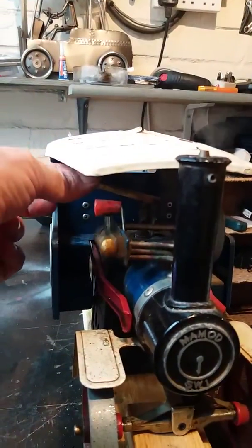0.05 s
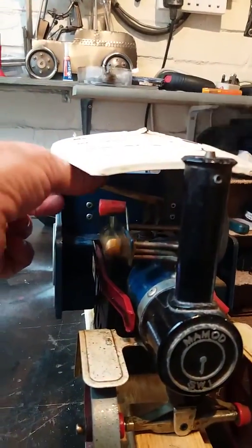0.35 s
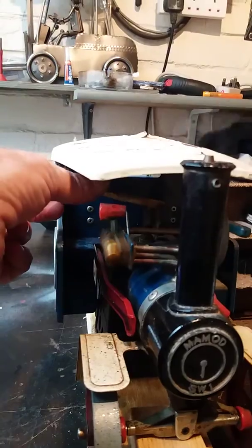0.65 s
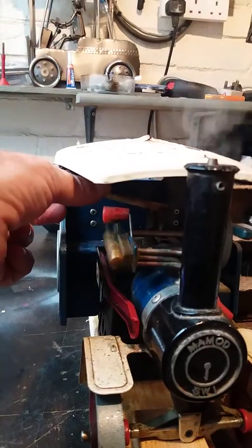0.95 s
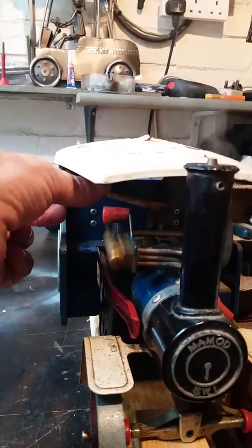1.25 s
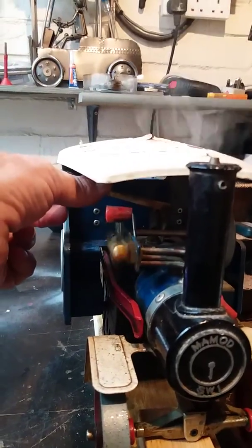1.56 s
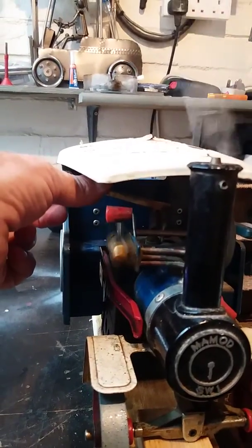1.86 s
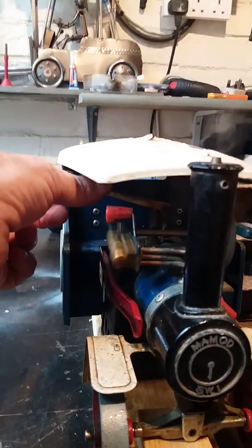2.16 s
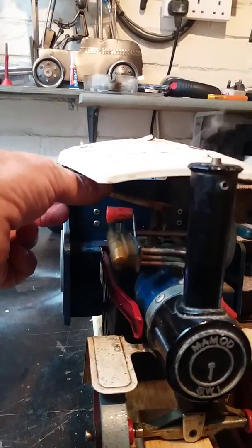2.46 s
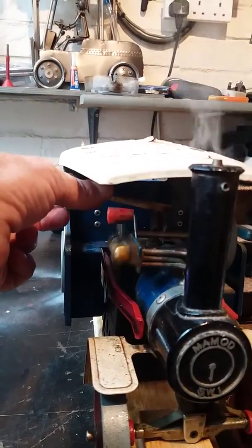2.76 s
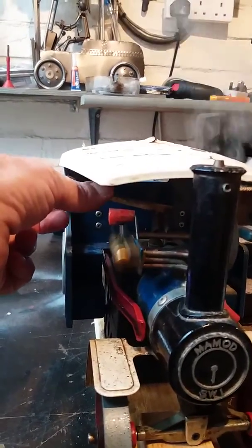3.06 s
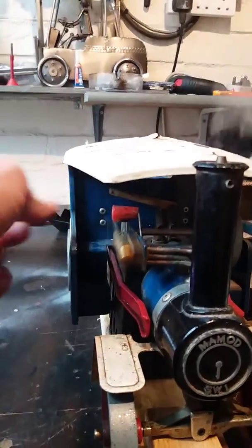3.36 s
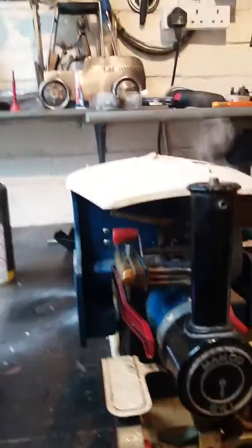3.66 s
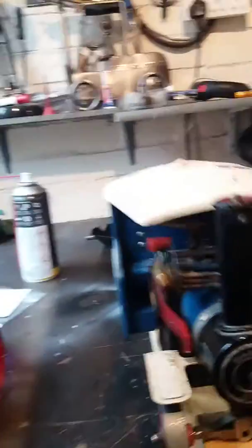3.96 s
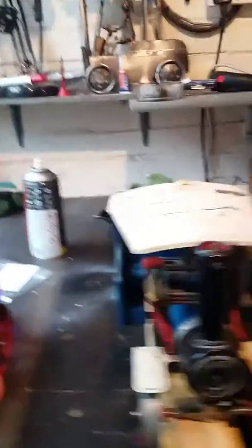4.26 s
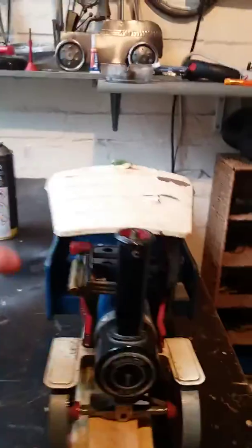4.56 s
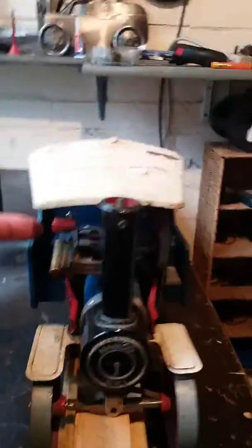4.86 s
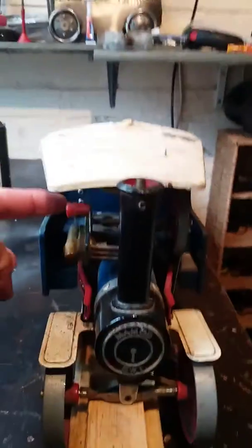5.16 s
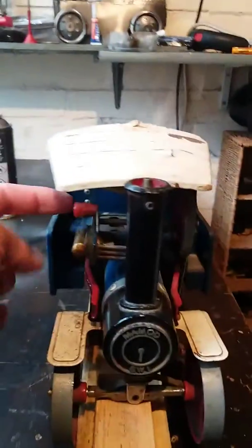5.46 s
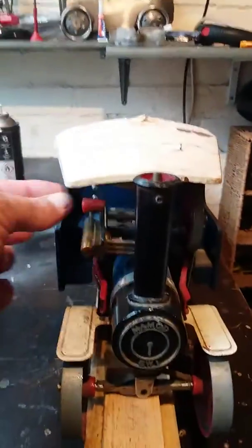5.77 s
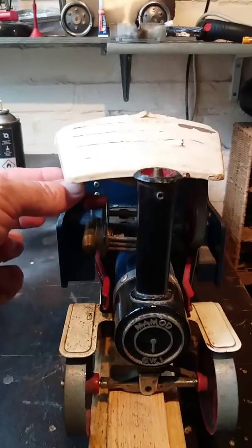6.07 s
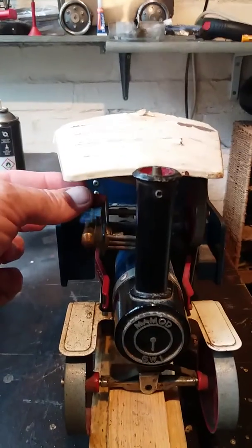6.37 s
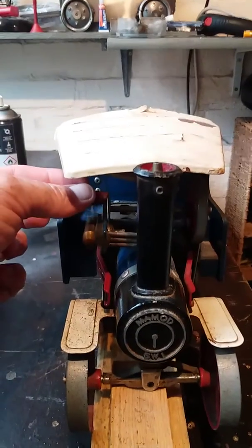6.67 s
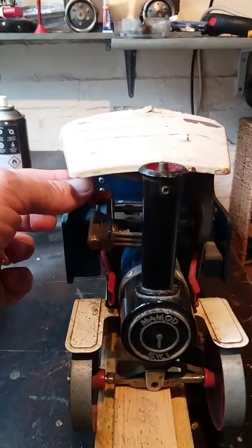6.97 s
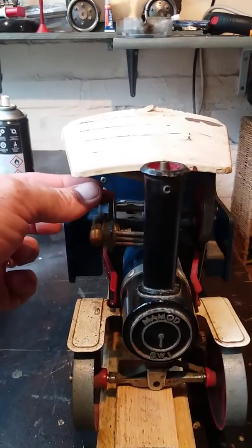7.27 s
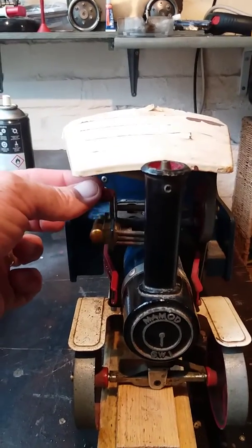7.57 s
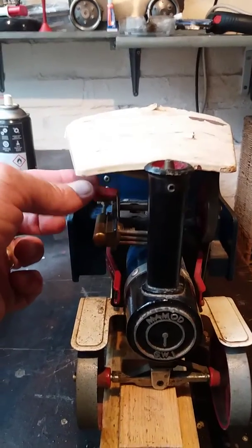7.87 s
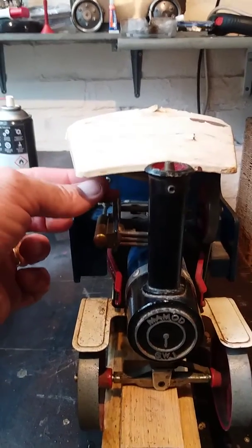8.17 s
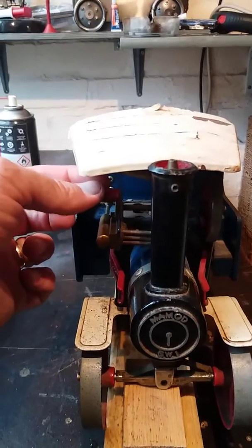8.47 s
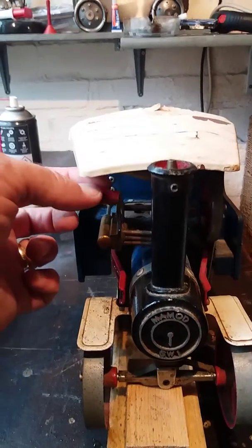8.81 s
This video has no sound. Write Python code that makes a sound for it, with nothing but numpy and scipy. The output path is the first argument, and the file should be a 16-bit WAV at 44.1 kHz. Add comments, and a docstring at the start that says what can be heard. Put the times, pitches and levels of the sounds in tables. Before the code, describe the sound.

Close up in a small workshop, a little steam engine chuffs quickly, its metal parts rattling and squeaking. Three brief, piercing whistle toots sound over it, then three more, each with wet hiss and gusts buffeting the microphone. The engine knocks harder for a while, labours and stalls. Steam keeps leaking quietly as a hand lightly rubs and taps the tin.

```python
"""A workshop bench, the microphone close to a running toy steam engine.
Each turn of the crank gives a knock in the tin body, a chuff up the chimney and a puff of hiss; late on
it labours, slows and stops, and a hand settles on the tin. Early on its tiny whistle is blown six times:
shrill, hissing and spitting, with gusts of wet steam striking the microphone.
The recorder's limiter holds the blasts down."""
import sys
import numpy as np
from scipy import signal
from scipy.fft import irfft, next_fast_len
from scipy.io import wavfile
from scipy.ndimage import uniform_filter1d

SR = 44100
rng = np.random.default_rng(int(sys.argv[2]) if len(sys.argv) > 2 else 0)


def int16_out(signal):
    """Quantize to a 16-bit WAV file."""
    q = np.round(np.clip(np.atleast_2d(signal).T, -1, 1) * 32767)
    wavfile.write(sys.argv[1], SR, q.astype(np.int16))


N = 389844
TIME = np.arange(N) / SR

# speed of the crank, which sags under load and stalls: t/s, speed/(turns per s)
CRANK_SPEED = [(0, 16.097), (.6, 16.245), (1.4, 15.765), (2.5, 15.921), (3.4, 15.04), (4.1, 15.036),
               (5, 15.54), (6.1, 15.671), (6.6, 14.808), (6.9, 10.388), (7.4, 11.392), (7.8, 8.492),
               (7.86, 0)]
def crank(start_turn):
    """Position of the crank in turns; it times every stroke of the engine."""
    return start_turn + np.cumsum(in_time(CRANK_SPEED)[0]) / SR


# force of the knock: t/s, level/dB
KNOCK_FORCE = [(0, -37.5), (.4, -34.5), (.55, -27.5), (1.3, -32), (2.3, -29), (3.3, -35), (4.2, -38),
               (4.65, -23.5), (5.1, -23), (6.42, -22.5), (6.62, -38.5), (7.6, -43.5)]
# strokes that catch hard or nearly miss: t/s, level/dB against the usual force
ODD_STROKES = [(0.678, -22), (3.469, 3), (6.008, -9), (6.072, -6.5), (6.136, 1), (6.2, -33), (6.265, 1.5),
               (6.823, -21), (6.916, 15), (7.196, 6), (7.66, -22)]
# how bright the knocks sound at the microphone, shifting through the scene: t/s, relative level/dB
BRIGHTNESS = [(0, -11.5), (.5, -8.5), (1.4, -0.5), (2.5, -7.5), (3.3, 3), (4.2, 5), (4.7, -7.5), (6.4, -7.5),
              (6.8, -9), (7.7, -1)]
# modes of the tin body and bench: f/Hz, level/dB, t60/s
BODY_MODES = [(221.4, -14.5, 0.064), (329, -6.5, 0.13), (411, -18, 0.14), (509, -4, 0.035),
              (566.7, 8.5, 0.035), (637.5, -1, 0.055), (882, -4.5, 0.048), (948, -7.5, 0.098),
              (1175, 7.5, 0.028), (1326, -13, 0.062), (690, -12.5, 0.11)]
# modes of the crank and cylinder: f/Hz, level/dB, t60/s
CLANK_MODES = [(1530, -8, 0.15), (1709, -0.5, 0.073), (2044, 8, 0.061), (2161, 7, 0.038),
               (2303, 4.5, 0.068), (3034, -4, 0.072)]
def knocks(turns, body_db, crack_db):
    """Close up, play in the crank closes once a turn; the same parts ring, brighter on harder knocks."""
    at = once_a_turn(turns, 0)
    times, force, brightness = TIME[at], in_time(KNOCK_FORCE)[0][at], in_time(BRIGHTNESS)[0][at]
    for s, db in ODD_STROKES:
        force[np.argmin(abs(times - s))] += db
    # the clank grows with the brightness, and faster than the knock with force
    clank_db = force - 0.5 + 1.67 * brightness + 1.44 * (force + 25.5)
    body = convolve(blows(times, force + body_db), ringing(BODY_MODES, attack=0.0093))
    clank = convolve(blows(times, clank_db), ringing(CLANK_MODES, attack=0.0047))
    contacts = blows(times, force + brightness + crack_db, spread_db=2.5)
    cracks = convolve(contacts, crack(t60=0.033, tail_db=-12, tail_t60=0.11, attack=0.0018))
    return body + clank + cracks + chatter(times, force + brightness)


# spectrum of metal striking metal: f/Hz, level/dB
CRACK_SPECTRUM = [(700, 3), (1500, 1.5), (3000, 3), (3900, -1.5), (5000, -0.5), (6600, -7), (8200, 3.5),
                  (11000, -4), (15500, -14)]
def crack(t60, tail_db, tail_t60, attack):
    """A metal contact with the scatter of nearby things behind it."""
    t = TIME[:SR // 4]
    decay = from_db(-60 * t / t60) + from_db(tail_db - 60 * t / tail_t60)
    return noise(CRACK_SPECTRUM, size=len(t)) * np.minimum(t / attack, 1) * decay


def chatter(times, level_db, gap_s=0.0049, loss_db=3):
    """The loose crank pin makes four uneven, fading bounces after each knock, duller than the first hit."""
    bounces = times[:, None] + np.cumsum(gap_s * rng.uniform(.5, 1.5, (len(times), 4)), axis=1)
    clicks = sum(blows(s, level_db - 1 - k * loss_db, spread_db=6) for k, s in enumerate(bounces.T))
    spectrum = [(900, 3), (2200, 0), (3200, -3), (5200, -2), (7000, -8), (15000, -18.5)]
    return convolve(clicks, burst(spectrum, t60=0.01))


# steam let out at each turn: t/s, relative level/dB at the cylinder, the same in the chimney
STEAM_FLOW = [(0, -38, -37), (.6, -36.5, -36), (1.5, -38.5, -38.5), (4.1, -39, -40), (4.6, -38, -34.5),
              (6.2, -32, -34), (7.55, -33.5, -33.5), (7.67, -31.5, -44.5), (7.8, -66, -37.5)]
# steady leak of steam: t/s, level/dB
LEAK = [(0, -81), (7.65, -51.5), (8, -56.5), (8.6, -56)]
# spectra of the cylinder's puff, the spat water and the chimney's chuff: f/Hz, level/dB
PUFF_SPECTRUM = [(900, -15.5), (1900, 4), (2750, 2), (3500, -8.5), (5200, 4), (6700, -8), (7900, 2),
                 (11000, 3), (13500, 3), (15200, 4), (16500, 2.5)]
SPIT_SPECTRUM = [(3000, -12.5), (7000, -9), (8300, 1), (10000, -1.5), (16000, -1)]
CHUFF_SPECTRUM = [(60, -34), (145, 0.5), (185, -11), (218, -1.5), (262, -7), (330, 4.5), (400, 6),
                  (460, -0.5), (660, -2), (790, -13.5), (930, -4), (1200, -4.5), (1550, -23), (2300, -12),
                  (4000, -33)]
def steam(turns, puff_db, spit_db, chuff_db):
    """Steam escapes at the cylinder face, spits a little water on the return and chuffs up the chimney."""
    cylinder_db, chimney_db = in_time(STEAM_FLOW)
    puff = port(turns, opens=0.662, rise=0.12, fall=0.22) * from_db(cylinder_db + puff_db + 2 * drift(56))
    splutter_db = 6.9 * drift(330) + 2.2 * drift(10)
    spit = port(turns, opens=0.25, rise=0.05, fall=0.11) * from_db(cylinder_db + spit_db + splutter_db)
    chuff = port(turns, opens=0.918, rise=0.055, fall=0.92) * from_db(chimney_db + chuff_db)
    leak = from_db(in_time(LEAK)[0] + 2 * drift(380))
    hiss = (puff + leak) * noise(PUFF_SPECTRUM)
    return hiss + spit * noise(SPIT_SPECTRUM) + chuff * noise(CHUFF_SPECTRUM)


FULL_SPEED, SLOW_SPEED = 15.5, 10   # turns per s, running free and labouring
STOP_S, RELEASE_S = 7.86, 0.08
def port(turns, opens, rise, fall):
    """Flow through a port, timed in full-speed turns; a puff keeps its length down to SLOW_SPEED."""
    since = (turns - opens) % 1 * FULL_SPEED / np.maximum(in_time(CRANK_SPEED)[0], SLOW_SPEED)
    running = np.clip((STOP_S - TIME) / RELEASE_S, 0, 1)
    return np.minimum(since / rise, 1) * np.exp(-np.maximum(since - rise, 0) / fall) * running


# pressure pulse of the exhaust: t/s, level/dB
EXHAUST_PULSE = [(0, -34), (.55, -27.5), (1.7, -36), (2.3, -32), (3.3, -38.5), (4.2, -43.5), (5, -30.5),
                 (6.1, -32.5), (6.7, -36.5), (7.5, -33.5), (7.7, -44)]
# modes of the hollow chimney and boiler: f/Hz, level/dB, t60/s
CHIMNEY_MODES = [(130.8, -15.5, 0.39), (319.7, -4, 0.16), (383, -3, 0.058), (466, 0.5, 0.047),
                 (549, -0.5, 0.045), (672.4, -3.5, .07), (1120, -7, 0.034), (1340, -10, .035)]
def exhaust(turns, opens, shuts, shut_db):
    """The exhaust port thumps the chimney as it opens, and again as it shuts."""
    level_db, = in_time(EXHAUST_PULSE)
    first, second = once_a_turn(turns, opens), once_a_turn(turns, shuts)
    pulses = blows(TIME[first], level_db[first]) + blows(TIME[second], level_db[second] + shut_db)
    return convolve(pulses, ringing(CHIMNEY_MODES, attack=0.0015))


# piston squeaks: t/s, level/dB of the low squeak, level/dB of the high one
SQUEAKS = [(0, -37, -49), (3.6, -41.5, -64), (4.6, -37, -33.5), (6.4, -37, -42), (7.6, -35, -42)]
# squeaks that stand out: t/s, level/dB above the usual
ODD_SQUEAKS = [(.168, 4), (2.043, 5), (3.587, 10), (3.655, 7), (4.052, 6), (7.172, 3.5)]
def squeak(turns, voice, hz, width_hz, scatter_hz, spread_db=3):
    """The piston rubs with a short, scratchy squeak (voice 0 low, 1 high), different on each turn."""
    turn = turns.astype(int)
    pitch, strength = rng.standard_normal((turn.max() + 1, 2)).T
    stroke_db = spread_db * strength
    for s, db in ODD_SQUEAKS:
        stroke_db[turn[int(s * SR)]] = db
    phase = phase_of(hz + scatter_hz * pitch[turn] + width_hz * drift(1500))
    scratch = from_db(in_time(SQUEAKS)[voice] + stroke_db[turn] + 4.8 * drift(600))
    return port(turns, opens=0.606, rise=0.22, fall=0.07) * scratch * np.sin(phase) * (TIME < 7.6)


# wet chirps on the return stroke: t/s, level/dB
CHIRPS = [(0, -42), (.6, -35.5), (1.8, -46), (4.2, -42), (6.3, -63), (6.9, -42.5)]
def chirps(turns, hz_per_speed, climb_hz_per_turn, scatter_hz, opens):
    """Water squeezed out at the cylinder face chirps upwards, lower as the crank slows."""
    turn = np.floor(turns - opens).astype(int) + 1
    pitch, strength = rng.standard_normal((turn.max() + 1, 2))[turn].T
    start_hz = hz_per_speed * in_time(CRANK_SPEED)[0] + scatter_hz * pitch
    climb_hz = climb_hz_per_turn * np.minimum((turns - opens) % 1, .4)
    phase = phase_of(start_hz + climb_hz + 900 * drift(2300))
    level = from_db(in_time(CHIRPS)[0] + 4.1 * strength + 5.9 * drift(450))
    return port(turns, opens, rise=0.044, fall=.07) * level * np.sin(phase) * (TIME < 7.6)


# the shaken bench: t/s, level/dB at 9 times the crank rate, level/dB at 14 times
BENCH_HUM = [(0, -55, -55), (1.8, -59, -49.5), (3.4, -52, -61), (4.2, -54.5, -57), (5, -56.5, -44.5),
             (6.15, -58, -43.5), (6.25, -62, -54)]
def bench_hum(turns):
    """The bench under the engine takes up two overtones of the crank rate."""
    low_db, high_db = in_time(BENCH_HUM)
    low = from_db(low_db + 2 * drift(20)) * np.sin(2 * np.pi * 9 * turns)
    high = from_db(high_db) * np.sin(2 * np.pi * 14 * turns)
    return np.sqrt(2) * (low + high)


# spectra of the whistle's steam jet and of the hiss at its valve: f/Hz, level/dB
JET_SPECTRUM = [(40, -31), (90, -0.5), (250, -7.5), (600, -13.5), (1200, -14), (2500, -15.5), (5000, -22.5),
                (7500, -18.5), (10000, -21.5), (13000, -21.5), (15500, -14.5)]
VALVE_SPECTRUM = [(1000, 0), (4000, -12.5), (6200, 5), (9000, 1.5), (15500, -26)]
def whistle(jitter, waver, break_up, jet_db, low_tone_hz, room_db):
    """Steam sounds a short pipe; as the valve shuts it spits and breaks up, and the workshop rings on."""
    pitch, drive, rush, overtone, low_level, closing, ring, spit = blast_controls()
    unsteady = waver * drift(45) + (jitter + break_up * closing) * (drift(150) + drift(1500))
    phase = phase_of(pitch * (1 + unsteady))
    # droplets in the pipe make the tone flutter
    drive = drive * from_db(1.37 * drift(200))
    octave = overtone * from_db(5 * drift(250)) * np.sin(2 * phase)
    # a weak flow only hisses: the pipe needs some pressure to speak
    tone = drive * np.minimum(drive / 0.12, 1) * np.sin(phase)
    # a faint low tone from the recorder during loud blasts
    low_phase = phase_of(low_tone_hz + 96 * drift(400))
    low_tone = low_level * (np.sin(low_phase) + 0.39 * np.sin(2 * low_phase))
    jet = rush * from_db(jet_db + 4.2 * drift(160)) * noise(JET_SPECTRUM)   # the wet jet splutters
    hiss = spit * noise(VALVE_SPECTRUM)
    high_ring = ring * noise([(12500, -35), (14500, 4), (15800, -3.5), (17000, -34)])
    room = from_db(room_db) * workshop(tone + 0.25 * jet, t60=0.19)
    return tone + octave + low_tone + jet + hiss + high_ring + room


WEAK_HZ, THIN_DB = 6727, -14   # pitch of the barely filled pipe; the rush while the valve hesitates
SEEP_S, SEEP_DB, SEEP_HISS_DB, SEEP_HZ_PER_S = 0.033, -32.5, -34.5, 79000
SAG_S, SPIT_S, RING_T60_S = 0.02, 0.009, 0.09   # as the valve shuts
# whistle blasts: opening t/s, shutting t/s, full pitch f/Hz, drive level/dB, hesitation t/s, then relative
# level/dB of the octave, the recorder's low tone, the overtone's ring, rush of steam and shut-off spit
BLASTS = [(0.684, 0.793, 7807, 5, 0.0023, 6.5, -11, -23.5, 0.5, -10.5),
          (0.996, 1.155, 7690, 3.5, 0.0033, -7.5, -23.5, -22.5, 0.5, -22),
          (1.345, 1.526, 7646, 5, 0, -9.5, -40, -20, 0.5, -15),
          (2.331, 2.479, 7526, 1, 0.037, -8, -38, -21, 0.5, -17),
          (2.668, 2.853, 8140, 1.5, 0, -3, -21, -17.5, -2.5, -15.5),
          (2.964, 3.142, 7947, 0, 0.0011, -9.5, -20.5, -16.5, -1, -9)]
def blast_controls():
    """Pitch and strengths of the whistle: steam seeps past the valve, fills the pipe and is shut off."""
    controls = np.zeros((8, N))
    for opens, shuts, top_hz, level_db, hesitation, *parts_db in BLASTS:
        octave, low_tone, ring, rush, spit = from_db(parts_db)
        near = slice(int((opens - SEEP_S) * SR), int((shuts + .5) * SR))
        t = TIME[near]
        opening, fill = valve(t, opens, shuts, hesitation)
        seep_hz = SEEP_HZ_PER_S * np.maximum(opens - t, 0)
        pitch = (t < shuts) * (WEAK_HZ + (top_hz - WEAK_HZ) * fill - seep_hz)
        drive = (t < shuts) * (opening + from_db(SEEP_DB)) * from_db(level_db - 9 * (1.5 - fill))
        # a hesitant valve gives a thin tone before the steam rushes out
        jet = drive * rush * np.where(t < opens + hesitation, from_db(THIN_DB * opening), 1)
        # the octave and the low tone come up only near full pressure
        full = drive * opening * (.12 + 0.65 * fill ** 5)
        # the whistle's high overtone rings briefly in the room as the valve shuts
        dying = ramp_to(t, shuts, SAG_S) * from_db(-60 * np.maximum(t - shuts, 0) / RING_T60_S)
        closing = np.exp(-np.minimum(((t - shuts + SPIT_S) / SPIT_S) ** 2, 20))
        hiss = closing * spit + (t < opens) * from_db(SEEP_HISS_DB) * ramp_to(t, opens, SEEP_S)
        controls[:, near] += [pitch, drive, jet, full * octave, full * low_tone,
                              closing, dying * ring, hiss]
    return controls


def valve(t, opens, shuts, hesitation, attack_s=0.0075, fill_s=0.013, sag_share=0.65):
    """How far the valve is open and how full the pipe is, both 0-1: it fills fast and sags at the end."""
    opening = np.clip((t - opens) / (attack_s + .5 * hesitation) + 0.71, 0, 1) ** 2
    fill = 1 - np.exp(-np.maximum(t - opens - hesitation, 0) / fill_s)
    return opening, fill * (1 - sag_share * ramp_to(t, shuts, SAG_S) ** 2)


# the heaviest gusts of wet steam on the microphone: t/s, relative level/dB
GUSTS = [(0.687, -15.5), (0.701, -4.5), (.778, 0), (1.096, -6), (1.119, -7), (1.514, -9.5), (2.461, -9.5),
         (2.702, -4.5), (2.763, -7), (2.832, -4.5), (3.02, -5), (3.06, -13.5), (3.11, -7.5), (3.129, -7)]
def gusts(heavy_db, light_db, light_per_s, travel_s=0.025):
    """The whistle's steam strikes the microphone in damped thumps; the light ones merge into a rumble."""
    blowing = sum((TIME > opens + hesitation + travel_s) & (TIME < shuts)
                  for opens, shuts, _, _, hesitation, *_ in BLASTS)
    clicks = (rng.random(N) < blowing * light_per_s / SR) * from_db(light_db + 2 * rng.standard_normal(N))
    for s, db in GUSTS:
        clicks[int(s * SR)] = from_db(db + heavy_db)
    modes = [(99, 0, 0.031), (187, 9.5, 0.011), (533, 2.5, 0.0053), (1300, -2, 0.006)]
    return convolve(clicks * rng.choice([-1, 1], N), ringing(modes, attack=0.0005))


# small knocks as the hand settles: t/s, relative level/dB
TAPS = [(8.34, -50), (8.64, -55)]
# the hand rubbing on the canopy: t/s, level/dB
RUBBING = [(8.25, -62), (8.37, -55), (8.7, -52), (8.84, -57)]
def hand(tap_db):
    """Fingers rub and tap the tin of the stopped engine."""
    clicks = np.zeros(N)
    for s, db in TAPS:
        clicks[int(s * SR)] = from_db(db + tap_db)
    ring = convolve(clicks, ringing(BODY_MODES, attack=0.0059) + ringing(CLANK_MODES))
    contact = convolve(clicks, crack(t60=0.0201, tail_db=11, tail_t60=0.061, attack=0.0054))
    rub = noise([(90, -31), (190, 13), (260, -13.5), (340, 7), (520, -31), (6000, -51)])
    return ring + .5 * contact + from_db(in_time(RUBBING)[0]) * rub


def simmer(per_s, level_db, sizzle_db):
    """Water sputters faintly in the hot boiler, in small random ticks with a fine sizzle on top."""
    ticks = (rng.random(N) < per_s / SR) * from_db(level_db + 3.1 * rng.standard_normal(N))
    ring = ringing([(2055, 0.0035, .025), (2640, 0.0037, 0.02)])
    sizzle = from_db(sizzle_db) * burst([(7000, -28.5), (9000, 4.5), (15000, -5.5)], t60=0.011)
    return convolve(ticks, ring) + convolve(ticks, sizzle)


# spectrum of the quiet workshop: f/Hz, level/dB
ROOM_SPECTRUM = [(40, -25.5), (65, 2.5), (95, -14.5), (150, -8), (420, -15.5), (700, -20), (1550, -24),
                 (2400, -34), (4000, -39), (7000, -37), (9000, -36), (15000, -24)]
# low rumble: t/s, level/dB
RUMBLE = [(4.1, -75), (4.35, -53), (5.5, -54.5), (7, -82), (7.9, -80.5)]
def room_tone(floor_db):
    """The quiet room behind the engine, and a low rumble that swells midway."""
    floor = from_db(floor_db) * noise(ROOM_SPECTRUM)
    rumble = noise([(35, -18.5), (60, 8), (100, -15.5), (300, -51.5), (1000, -79)])
    return floor + from_db(in_time(RUMBLE)[0]) * rumble


def workshop(x, t60):
    """Dense reflections reach the microphone from shelves and walls; unit gain."""
    t = TIME[:SR // 2]
    tail = rng.standard_normal(len(t)) * from_db(-60 * t / t60) * np.clip(t / 0.014 - .3, 0, 1)
    return convolve(x, tail / np.sqrt(np.sum(tail ** 2)))


def from_db(db):
    """Decibels to gain."""
    return np.exp(np.asarray(db) * (np.log(10) / 20))


def in_time(rows):
    """Each column of a curve, sample by sample."""
    s, *columns = np.transpose(rows)
    return [np.interp(TIME, s, c) for c in columns]


def ramp_to(t, end, length):
    """A rise from 0 to 1 that finishes at the time end."""
    return np.clip(1 + (t - end) / length, 0, 1)


def phase_of(hz):
    """Running phase of a changing pitch."""
    return 2 * np.pi * np.cumsum(hz) / SR


def once_a_turn(turns, angle):
    """Samples at which the crank passes an angle, given in turns."""
    return np.flatnonzero(np.diff(np.floor(turns - angle)) > 0) + 1


def noise(spectrum, size=N):
    """Noise of rms 1, coloured by rows of f/Hz, level/dB."""
    hz, db = np.transpose(spectrum)
    padded = next_fast_len(size, True)
    f = np.fft.rfftfreq(padded, 1 / SR) + 1
    gain = from_db(np.interp(np.log(f), np.log(hz), db)) * np.minimum(f / hz[0], 1) ** 2
    x = irfft(rng.standard_normal(2 * len(f)).view(complex) * gain, padded)[:size]
    return x / np.sqrt(np.mean(x ** 2) + 1e-20)


def burst(spectrum, t60):
    """A short, dying puff of noise."""
    return noise(spectrum, size=SR // 20) * from_db(-60 * TIME[:SR // 20] / t60)


def drift(rate):
    """A random wander through values of spread 1, rate of them a second."""
    knots = rng.standard_normal(N // 20)
    return np.interp(TIME * rate, np.arange(len(knots)), knots)


def blows(times, level_db, spread_db=0.9):
    """One click at each time, uneven in strength."""
    out = np.zeros(N)
    out[(times * SR).astype(int)] = from_db(level_db + spread_db * rng.standard_normal(len(times)))
    return out


def ringing(modes, attack=0.00011):
    """A struck part, its modes (f/Hz, level/dB, t60/s) out of step; unit power over the first 10 ms."""
    t = TIME[:SR // 2]
    out = sum(from_db(db - 60 * t / t60) * np.sin(2 * np.pi * hz * t - k * np.pi / 2)
              for k, (hz, db, t60) in enumerate(modes))
    out = out * np.minimum(t / attack, 1)
    return out / np.sqrt(np.mean(out[:SR // 100] ** 2))


def convolve(x, response):
    """Let x excite a response."""
    return signal.fftconvolve(x, response)[:N]


def scene():
    """At one microphone by the bench: engine and whistle close up, the quiet workshop behind."""
    turns = crank(start_turn=0.115)
    engine = knocks(turns, body_db=-0.8, crack_db=4)
    engine += steam(turns, puff_db=0.5, spit_db=-7, chuff_db=2)
    engine += bench_hum(turns)
    engine += exhaust(turns, opens=0.023, shuts=0.215, shut_db=-4)
    engine += squeak(turns, voice=0, hz=2703, width_hz=200, scatter_hz=60.06)
    engine += squeak(turns, voice=1, hz=4910, width_hz=370, scatter_hz=119.4)
    engine += chirps(turns, hz_per_speed=500, climb_hz_per_turn=8870, scatter_hz=500, opens=0.15)
    engine += from_db(-11.5) * workshop(engine, t60=0.33)
    blasts = whistle(jitter=0.0022, waver=0.0035, break_up=0.025, jet_db=-12,
                     low_tone_hz=1079, room_db=-5.5)
    quiet = hand(tap_db=-1) + simmer(per_s=99, level_db=-64.5, sizzle_db=9) + room_tone(floor_db=-54.5)
    thumps = gusts(heavy_db=-3, light_db=-20.5, light_per_s=110)
    return (engine + blasts + thumps + quiet)[None]


def limiter(x, ceiling_db, release_db_per_s):
    """Turns the gain down at once on loud treble and lets it back quickly."""
    treble = signal.sosfilt(signal.butter(2, [1000, 10000], "band", fs=SR, output="sos"), x)
    treble_db = 10 * np.log10(np.abs(uniform_filter1d(treble ** 2, size=130)) + 1e-12)
    over_db = np.maximum(treble_db - ceiling_db, 0)
    held_db = np.maximum.accumulate(over_db + release_db_per_s * TIME) - release_db_per_s * TIME
    return x * from_db(-uniform_filter1d(held_db, size=90))


def record(dry):
    """The recorder: bass roll-off, limiter, clipping at full scale and a steep top cut."""
    heard = signal.sosfilt(signal.butter(5, 54, "high", fs=SR, output="sos"), dry[0])
    limited = np.clip(limiter(heard, ceiling_db=-13, release_db_per_s=340), -1, 1)
    return signal.sosfilt(signal.ellip(12, .2, 70, 15950, fs=SR, output="sos"), limited)[None]


dry = scene()
out = record(dry)
int16_out(out)
```